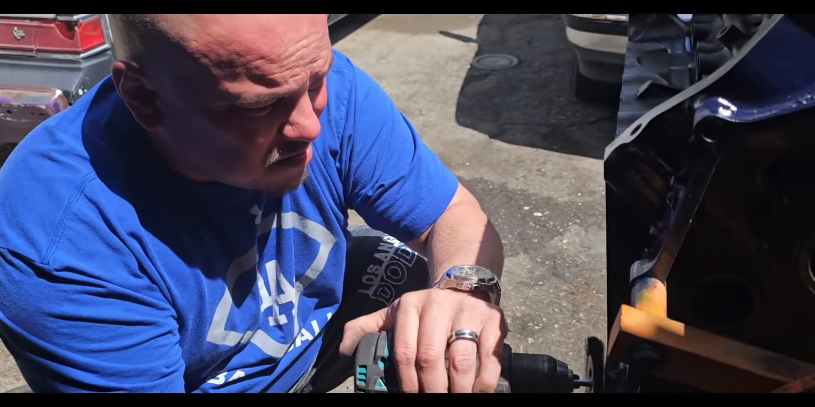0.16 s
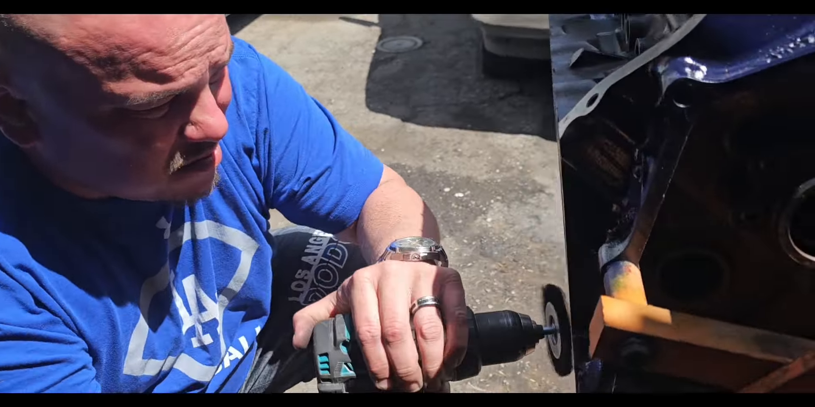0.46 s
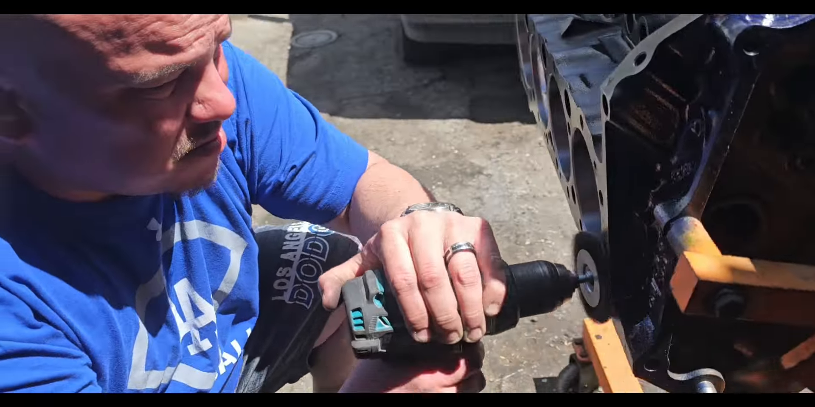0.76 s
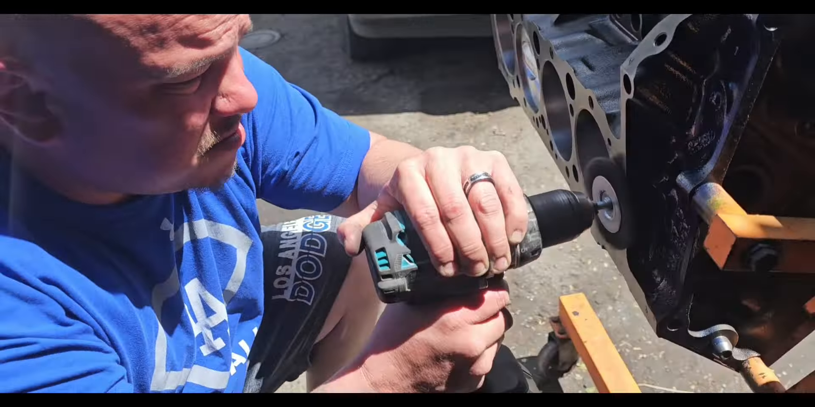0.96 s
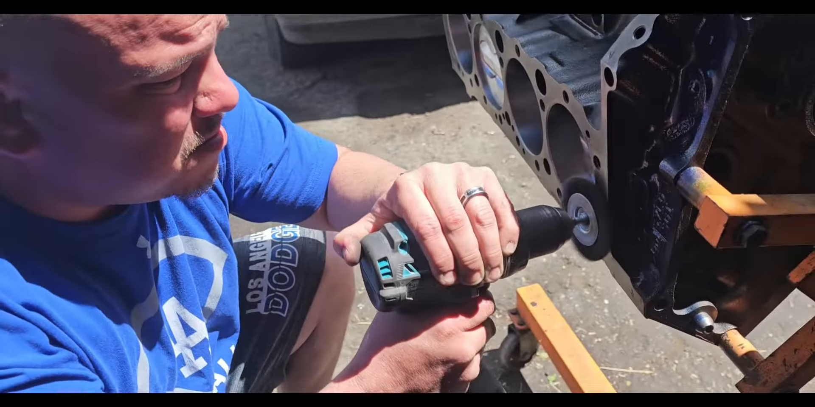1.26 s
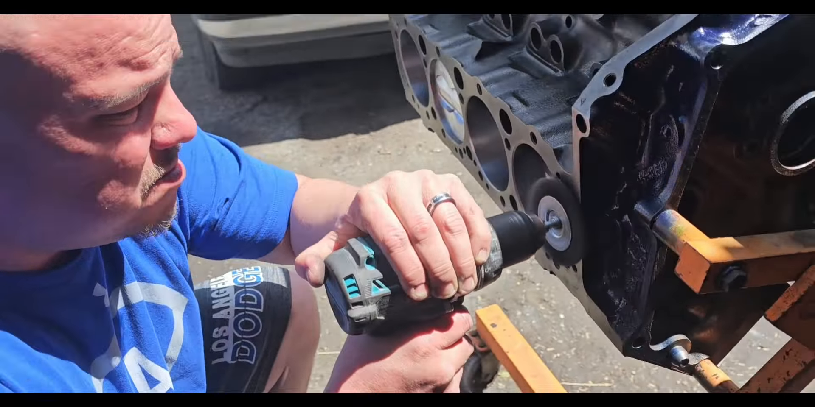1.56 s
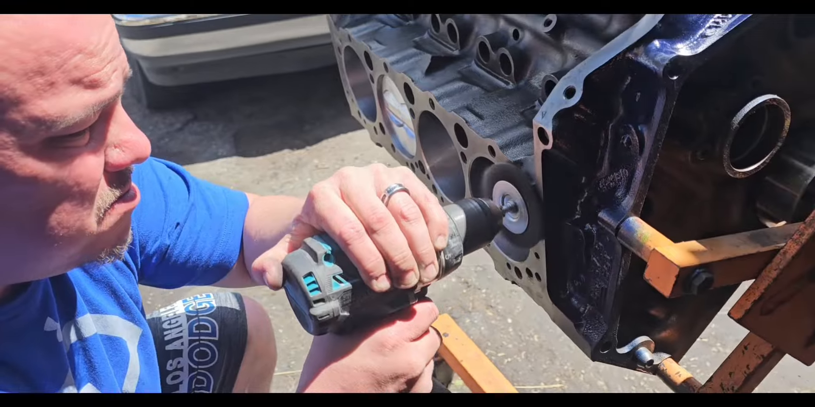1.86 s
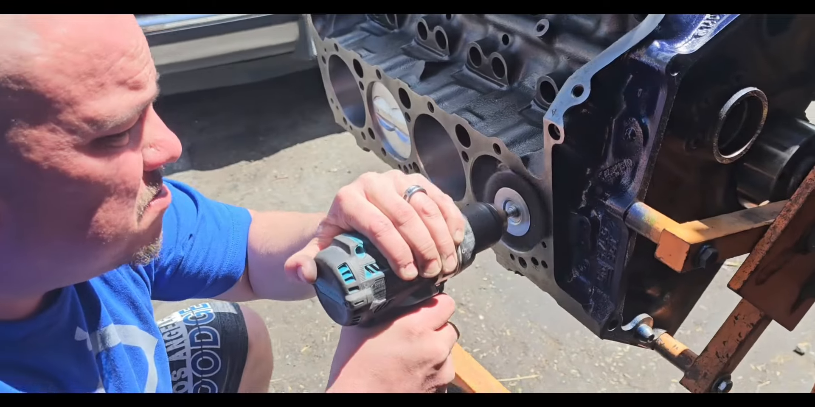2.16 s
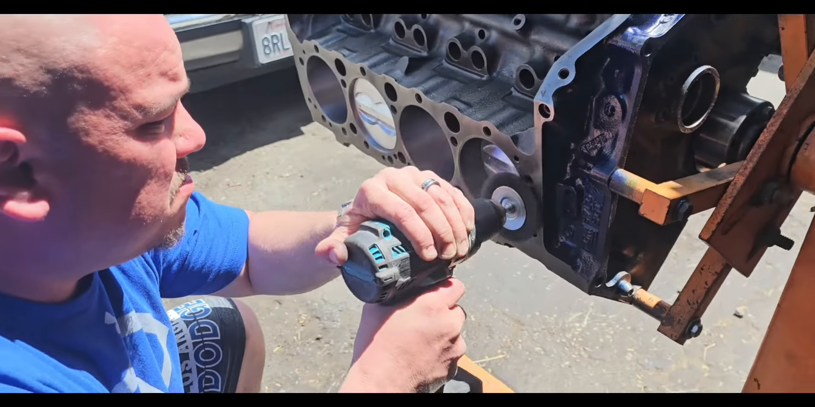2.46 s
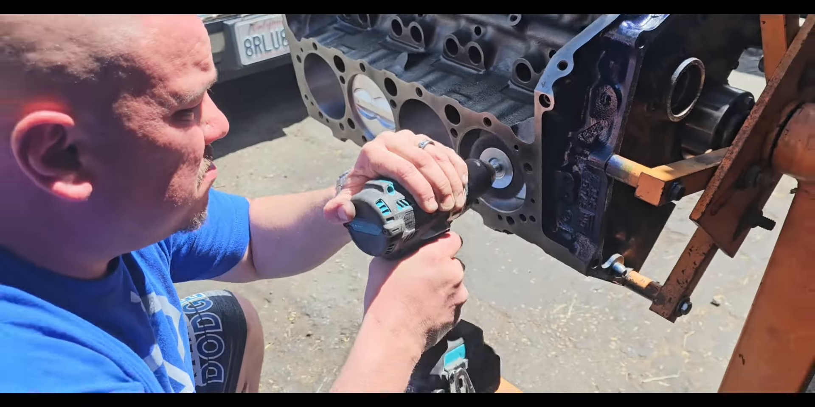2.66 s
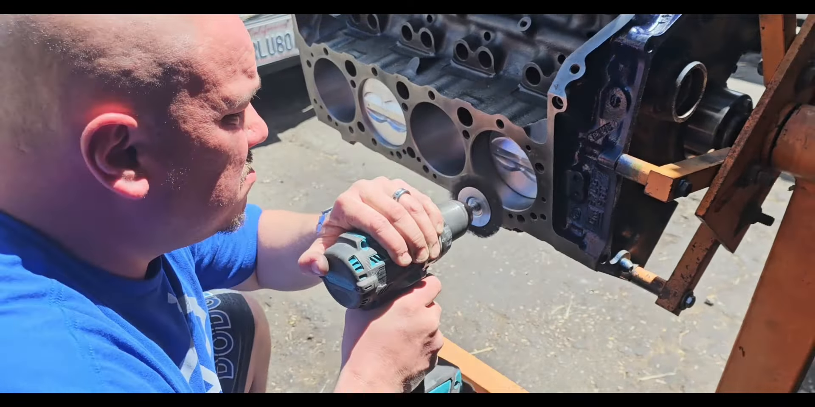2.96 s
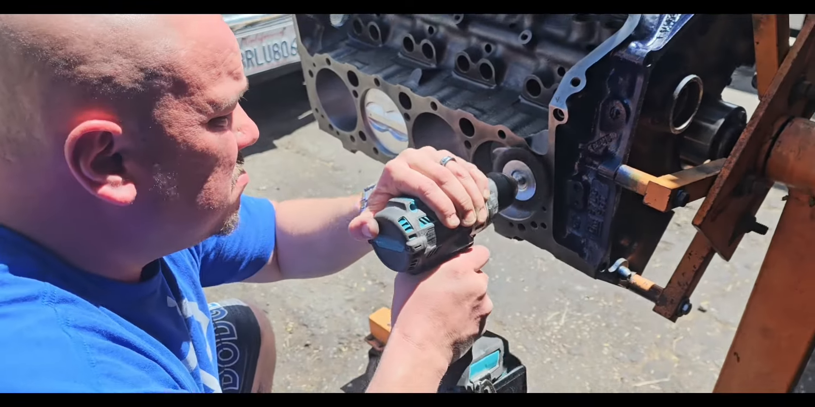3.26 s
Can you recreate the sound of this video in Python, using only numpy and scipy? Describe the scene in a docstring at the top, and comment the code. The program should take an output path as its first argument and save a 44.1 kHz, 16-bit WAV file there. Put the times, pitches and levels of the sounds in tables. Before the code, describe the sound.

Wire wheel on a drill hisses and rasps against an iron engine block, clacking through one quick stop

```python
"""Wire wheel on an engine block

A cordless drill spins a wire wheel on cast iron, an arm's length from a stereo microphone.
The scrape is random bristle flicks and hiss over coloured noise; motor and gears add tones locked to
the turning shaft. Near the end the trigger is let go: the drill brakes nearly to a stop with gear clacks,
noise bursts ringing the gearbox, and spins up again. Filtered noise and sines put rumble and hum behind."""
import sys
import numpy as np
from scipy import signal
from scipy.fft import rfft, irfft
from scipy.io import wavfile
from scipy.ndimage import uniform_filter1d

SR = 44100
rng = np.random.default_rng(int(sys.argv[2]) if len(sys.argv) > 2 else 0)


def inscribe(sig):
    """Save sig as 16-bit PCM at rate SR to the path in sys.argv[1].

    A 1-D sig is mono; a 2-D sig holds one channel per row.
    Samples are clipped to [-1, 1] before scaling.
    """
    pcm = np.round(np.clip(np.atleast_2d(sig).T, -1, 1) * 32767)
    wavfile.write(sys.argv[1], SR, pcm.astype(np.int16))


N = 149940
T = np.arange(N) / SR  # seconds
F = np.maximum(np.fft.rfftfreq(N, 1 / SR), 1)  # Hz

# Motor speed, before a slight flutter: time_s, turns_per_s
MOTOR_SPEED = [(0, 457.5), (.25, 455.6), (1.3, 454.6), (1.9, 452.8), (2.16, 454.6), (2.35, 449.5),
               (2.52, 454.5), (2.76, 447.5), (2.87, 455.5), (2.97, 457.5), (3.0, 438), (3.035, 388),
               (3.06, 335), (3.085, 290), (3.125, 235), (3.2, 30), (3.275, 30), (3.295, 280), (3.335, 385),
               (3.36, 418), (3.4, 448)]

# Scrape of the wheel, before SCRAPE_DB and TREBLE_DB: time_s, level_db, treble_rel_db
SCRAPE = [(0.0, -27, -3), (0.79, -23.5, -5), (1.27, -23, -4), (1.6, -23.5, -3.5), (1.69, -24.5, -2.5),
          (1.73, -23.5, -4.5), (2.17, -23, -4), (2.34, -21.5, -6), (2.41, -23.5, -4), (2.72, -22, -5.5),
          (2.96, -26.5, -3.5), (3.01, -23, -5), (3.05, -27, 6.5), (3.08, -24.5, -3.5), (3.13, -26.5, -5.5),
          (3.14, -20.5, -4), (3.16, -34, 0), (3.2, -26, -19), (3.23, -37.5, -14), (3.25, -42, -9),
          (3.27, -34.5, -13), (3.28, -24, -7), (3.29, -25.5, -6.5), (3.4, -27, -2)]
# Spectrum of bristles on iron: freq_hz, relative_db
BRISTLE_COLOUR = [(150, -31), (400, -41), (1400, -7.5), (1800, -14.5), (2300, -2.5), (3000, 0.5),
                  (3700, -4), (4300, 4.5), (4900, 2), (5500, 1), (6500, -6.5), (7800, -5), (9000, -9),
                  (9800, -5.5), (10080, -19), (10800, -10.5), (11600, -5.5), (13000, -11), (14500, -6.5),
                  (16000, -24)]
# Stereo balance of the scrape: freq_hz, left_minus_right_db
SCRAPE_PAN = [(500, -8), (1500, 0), (2600, 0.5), (4000, -5), (5800, -4), (7000, -3.5), (8100, 5), (9200, 5),
              (11000, -5.8), (13000, 10), (15000, -4.5)]
# The block's ringing band, which shifts with the place of contact: time_s, level_db, centre_hz
BLOCK_RINGING = [(0, -30, 3950), (.2, -28.5, 3970), (.44, -24.5, 4120), (.51, -27.5, 4050),
                 (.58, -22.5, 4000), (.63, -27, 4060), (.68, -22.5, 4000), (.77, -23, 3920),
                 (.81, -25, 3920), (.92, -23.5, 3900), (1.0, -26.5, 3950), (1.25, -28, 3990),
                 (1.4, -25.5, 3870), (1.6, -26, 3820), (1.85, -26, 3770), (2.05, -27.5, 3920),
                 (2.2, -28.5, 3880), (2.34, -26.5, 4030), (2.44, -32, 3830), (2.65, -29, 3900),
                 (2.9, -32, 3700), (3.09, -29, 3860), (3.16, -29.5, 3850), (3.2, -22.5, 4050),
                 (3.23, -63, 4000), (3.272, -65, 3400), (3.29, -34, 3440), (3.32, -36, 3500),
                 (3.4, -49, 3900)]
# Low-mid air rush of the motor's cooling fan, before a 4 dB lift: time_s, level_db
FAN_RUSH = [(0.0, -43), (1.78, -41), (1.83, -39), (2.19, -43), (2.27, -39), (2.34, -43), (2.73, -41),
            (2.77, -45), (3.17, -39), (3.26, -58), (3.28, -39), (3.29, -37), (3.3, -48), (3.4, -41)]
# Its spectrum: freq_hz, relative_db
FAN_RUSH_COLOUR = [(200, -20), (410, -12), (520, -3.5), (700, -3.5), (850, -4), (1050, 1.5), (1400, -1),
                   (1700, 2), (2100, 1), (3000, -20), (9000, -45)]
SCRAPE_DB, TREBLE_DB = 1.68, 9.5
FLICKS_PER_S, FLICK_SPREAD_DB, HISS_SHARE = 5000, -1, 0.37
WHIRR_DB, COASTING_WHIRR_DB = -12.5, 12  # gear tones within the scrape, and their rise below full speed
CATCHES_PER_S, CATCH_SIZE, CATCH_DECAY_S = 130, .45, .001  # wires that snag and spring free
WANDER_DB, WANDER_HZ, WANDER_BAND_HZ = 1.4, 4, (1800, 10000)
RING_WIDTH_HZ, RING_SURGE_DB, RING_SURGE_HZ = 900, 1.8, 25

# Main whine of the motor, before its rougher part is added: time_s, level_db
WHINE = [(0, -36), (.04, -57), (.17, -50), (.29, -34), (.68, -32), (.93, -36.5), (1.12, -43), (1.44, -37.5),
         (1.54, -41), (1.68, -36), (1.85, -35.5), (2.2, -38.5), (2.36, -45), (2.44, -37), (2.56, -36),
         (2.68, -49), (2.87, -38.5), (3.0, -43), (3.06, -58), (3.22, -70), (3.3, -68), (3.4, -38)]
# Gear mesh tone: time_s, level_db
GEAR_MESH = [(0, -46), (.35, -44), (.45, -35), (.55, -41), (.65, -31), (.83, -44), (1.05, -35), (1.4, -38),
             (1.55, -32), (1.68, -40), (1.85, -31), (2.15, -31), (2.37, -27.5), (2.46, -38), (2.75, -36),
             (2.95, -50), (3.2, -65), (3.4, -48)]
# Second gear tone, joining under heavy load: time_s, level_db
UPPER_MESH = [(0, -49), (2.17, -45), (2.25, -33), (2.38, -33.5), (2.44, -46), (2.7, -40), (2.95, -50),
              (3.2, -70)]
# Tone at the motor's turning rate: time_s, level_db
SHAFT = [(0, -52), (1.0, -54.5), (2.2, -58), (2.5, -58.5), (3.0, -60.5), (3.2, -83), (3.4, -56)]
# Other motor and gear tones: multiple_of_motor_speed
OTHER_ORDERS = [8, 16, 22.85, 23]
# For each of these, at top speed: level_db, roughness_0_to_1, left_minus_right_db
OTHER_TONES = [(-43, 1, 3), (-40.5, 0.5, 4), (-46, 1, -4), (-36, .65, 10)]
WHINE_ORDER, MESH_ORDER, UPPER_MESH_ORDER = 4, 10.17, 11.52  # multiples of the motor speed

# Gear tones while the speed changes, before the brake's swell and the housing's treble filter:
# multiple_of_motor_speed, braking_db, speeding_up_db, roughness_0_to_1
GEAR_STRAIN = [(8, -31, -34, .55), (10.17, -43, -35, .85), (14.3, -42, -44, .9), (19, -50, -44, .9),
               (23, -50, -44, .95)]
FULL_STRAIN = 700  # change of speed (turns per second, per second) that loads the teeth fully
HOUSING_HZ, STRAIN_PATCH_DB = 2900, 2
BRAKE_S, BRAKE_DECAY_S, BRAKE_SWELL_DB = 2.996, .036, 14

# Clacks of gears and chuck, as drive into the gearbox: start_s, level_db
CLACKS = [(2.3712, -15), (3.0155, -18), (3.0265, -18), (3.0415, -12), (3.060, -18), (3.108, -18),
          (3.1325, -21), (3.138, -20), (3.1436, -13.5), (3.17, -19), (3.1917, -8.5), (3.199, -22),
          (3.2775, -9.5)]
# Ring of gearbox and chuck: pitch_hz, relative_db, t60_s
GEARBOX_RING = [(2420, 0, .04), (2650, -3, .03), (3540, -6, .025), (4030, 0, .03), (4580, -7, .025),
                (6330, -9, .02), (8650, -12, .02)]
RATTLE_PER_S, RATTLE_DB = 200, -21.5

# Soft knocks, before reflections: start_s, pitch_hz, level_db, decay_s
KNOCKS = [(2.452, 251, -39.5, 0.042), (2.459, 172, -36.5, 0.023), (2.481, 80, -41, 0.018),
          (3.233, 96, -24, 0.0057)]
# Faint low rumble: time_s, level_db
RUMBLE = [(0, -59.5), (.9, -63), (1.15, -49.5), (1.45, -54.5), (1.8, -60), (2.3, -57.5), (3.4, -71)]

# Spectrum of the outdoor background: freq_hz, relative_db
YARD_COLOUR = [(20, -2), (40, -16), (60, 2), (90, -2), (160, -10), (260, -3.5), (400, -6), (1000, -18.5),
               (4000, -10), (15000, -42)]
# Steady hum: pitch_hz, level_db
HUM = [(58.5, -60), (119, -59), (258, -70)]
YARD_DB = -53

# Phase between the microphone ports: freq_hz, left_lead_rad
PORT_PHASE = [(0, -0.5), (1030, 1.72), (1810, 4.5), (2500, 5.5), (2760, 6.5), (3620, 14), (3960, 13),
              (4480, 17), (7320, 18), (8100, 18.5), (9130, 23.5), (10200, 23.5), (12400, 27.5), (16100, 30)]
LIKENESS, LIKENESS_HZ = .88, 2000  # likeness of the sides in the bass, and where it has halved
TOP_HZ = 15520


def wheel(angle, speed):
    """Wire tips flick the iron thousands of times a second and ring it; the finest flicks merge into hiss."""
    rub = ports(bristle_rub(angle, speed)) * snags()
    rub = rub * undb(0.1 * walk(48) + 0.13 * walk(210))

    # The block's resonance, with the sides swapped
    ring = resonate(rub, curve(BLOCK_RINGING, axis=2), RING_WIDTH_HZ)[::-1]
    ring = ring * undb(RING_SURGE_DB * walk(RING_SURGE_HZ))

    coloured = colour(wander(rub), BRISTLE_COLOUR)
    panned = unit(irfft(rfft(coloured) * pan(spectrum(SCRAPE_PAN)), N))

    # Split at 7 kHz so the treble moves on its own
    bins = rfft(panned)
    high = 1 / (1 + (7000 / F) ** 6)
    lower = irfft(bins * (1 - high), N)
    treble = irfft(bins * high, N) * undb(curve(SCRAPE, axis=2) + TREBLE_DB)
    scrape = (lower + treble) * undb(curve(SCRAPE) + SCRAPE_DB)
    return scrape + ring * pan(-2.5) * undb(curve(BLOCK_RINGING))


def bristle_rub(angle, speed):
    """Random signed flicks with short scattered reflections, mixed with hiss and gear whirr."""
    chance, size, sign = rng.random(N), rng.exponential(size=N), rng.choice([-1, 1], N)
    strikes = chance < FLICKS_PER_S / SR
    flicks = unit(strikes * sign * undb(FLICK_SPREAD_DB * np.minimum(size, 6)))
    flicks = unit(reflect(flicks, t60=0.0036, wet_db=14))
    hiss = rng.standard_normal((2, N))

    relative_speed = speed / speed.max()
    coasting = np.clip(10 * (1 - relative_speed), 0, 1)
    gears = undb(WHIRR_DB + COASTING_WHIRR_DB * coasting) * relative_speed
    mix = np.sqrt(1 - HISS_SHARE) * flicks + np.sqrt(HISS_SHARE) * hiss + gears * whirr(angle)
    return mix / np.sqrt(1 + 2 * gears ** 2)


def snags():
    """Gain that jumps as wires snag and decays as they spring free."""
    catches = (rng.random(N) < CATCHES_PER_S / SR) * np.minimum(rng.exponential(size=N), 3)
    return 1 + CATCH_SIZE * signal.lfilter([1], [1, -np.exp(-1 / (CATCH_DECAY_S * SR))], catches)


def whirr(angle, count=56):
    """A crowd of weak, fluttering gear and bristle tones that follow the speed."""
    orders = np.linspace(2, 20, count) + rng.uniform(-.15, .15, count)
    ripple = np.array([walk(13.4) for side in range(2)])
    out = 0
    for order in orders:
        flutter = np.roll(ripple, rng.integers(N), axis=1)
        out = out + flutter * np.cos(order * angle + rng.uniform(0, 2 * np.pi, (2, 1)))
    return unit(out)


def wander(x, count=22):
    """As the wheel shifts on the iron, narrow bands of the scrape swell and fade on their own."""
    place = np.interp(F, WANDER_BAND_HZ, [0, count - 1])
    whole, drift = rfft(x), walk(WANDER_HZ)
    out = 0
    for k in range(count):
        band = irfft(whole * np.maximum(1 - np.abs(place - k), 0), N)
        out = out + band * undb(WANDER_DB * np.roll(drift, rng.integers(N)))
    return out


def fan_rush():
    """Low-mid air rush of the motor's cooling fan, as coloured noise."""
    body = unit(ports(colour(rng.standard_normal((2, N)), FAN_RUSH_COLOUR)))
    return body * pan(1.6) * undb(curve(FAN_RUSH) + 4 + .8 * walk(60))


def motor(angle, speed):
    """Shaft, pole and gear tones at fixed multiples of the motor speed."""
    effort = (speed / speed.max()) ** 22  # these tones fade steeply below top speed
    out = 0
    for order, (db, rough, lr_db) in zip(OTHER_ORDERS, OTHER_TONES):
        part = tone(order * angle, rough, width_hz=max(order, 50 * rough ** 2))
        out = out + undb(db) * pan(lr_db) * part * effort
    out += undb(curve(SHAFT)) * pan(8.7) * tone(angle, rough=0.09, width_hz=1.8)

    whine = tone(WHINE_ORDER * angle, rough=.35, width_hz=16)
    whine += undb(-6) * tone(WHINE_ORDER * angle, rough=1, width_hz=70)
    out += undb(curve(WHINE)) * pan(4.2) * whine

    out += undb(curve(GEAR_MESH)) * pan(-5) * tone(MESH_ORDER * angle, rough=.65, width_hz=24)
    upper = tone(UPPER_MESH_ORDER * angle, rough=.7, width_hz=45)
    return out + undb(curve(UPPER_MESH)) * pan(-3) * upper


def strain(angle, speed):
    """Gear teeth sing in patches as the motor brakes or speeds up; the small housing radiates their treble."""
    change = uniform_filter1d(np.gradient(speed, T), size=400)
    swell = (T > BRAKE_S) * np.exp(-np.abs(T - BRAKE_S) / BRAKE_DECAY_S)
    braking = np.clip(-change / FULL_STRAIN, 0, 1) * undb(BRAKE_SWELL_DB * swell)
    rising = np.clip(change / FULL_STRAIN, 0, 1)
    out = 0
    for order, down_db, up_db, rough in GEAR_STRAIN:
        radiated = 1 / (1 + (HOUSING_HZ / (order * speed)) ** 12)
        patches = undb(STRAIN_PATCH_DB * walk(40))
        load = undb(down_db) * braking + undb(up_db) * rising
        out = out + load * radiated * patches * tone(order * angle, rough, width_hz=120)
    return out


def clacks(speed):
    """Gears and chuck close with cracks that ring the gearbox; slack rattles while the motor slows fast."""
    decay_s = 0.0014
    push = sum(undb(db) * (T >= s) * np.exp(-np.abs(T - s) / decay_s) for s, db in CLACKS)
    slowing = np.gradient(speed, T) < -1000  # turns per second, per second
    taps = (rng.random(N) < RATTLE_PER_S / SR) * rng.random(N) * slowing * undb(RATTLE_DB)
    push = push + signal.lfilter([1], [1, -np.exp(-1 / (decay_s * SR))], taps)
    crack = push * np.tanh(rng.standard_normal((2, N))) * 1.16

    ring = 0
    for hz, db, t60 in GEARBOX_RING:
        ring = ring + undb(db) * np.sin(2 * np.pi * hz * T) * np.exp(-np.log(1000) * T / t60)
    rung = signal.fftconvolve(crack, ring[None] / np.sqrt(np.sum(ring ** 2)))[:, :N]

    snap_colour = [(100, -46), (600, 6), (1500, -7.5), (2500, 19), (4500, 10.0), (8000, 10), (15000, -8)]
    snap = colour(ports(crack), snap_colour)
    return reflect(undb(-2) * rung + undb(-4) * snap, t60=.1, wet_db=-12)


def knocks():
    """Dull bumps as the tool and its work shift: decaying low sines with reflections."""
    out = 0
    for s, hz, db, decay in KNOCKS:
        age = np.maximum(T - s, 0)
        out = out + undb(db) * np.sin(2 * np.pi * hz * age) * np.exp(-age / decay)
    return reflect(out, t60=.1, wet_db=-19)


def rumble():
    """A faint low rumble of coloured noise that swells for a moment."""
    shape = [(60, -47), (150, -3.0), (200, 2), (300, 1.0), (500, -23), (2000, -65)]
    noise = unit(ports(colour(rng.standard_normal((2, N)), shape)))
    return noise * undb(curve(RUMBLE))


def yard():
    """Low outdoor rumble of mostly central noise, and a faint hum of sines with drifting phase."""
    mid, side = unit(colour(rng.standard_normal((2, N)), YARD_COLOUR))
    air = undb(YARD_DB) * (mid + undb(-7) * side * np.array([[1], [-1]]))
    hum = 0
    for hz, db in HUM:
        hum = hum + undb(db) * np.sqrt(2) * np.sin(2 * np.pi * hz * T + 1.46 * walk(9.9))
    return air + hum


def tone(angle, rough, width_hz):
    """A rotating part's tone; it flutters in level and phase, differently on each side."""
    rough = np.clip(rough, 0, 1)
    flutter = np.array([walk(width_hz) + 1j * walk(width_hz) for side in range(2)])
    steady = np.sqrt(2 * (1 - rough ** 2))
    return np.real((steady + rough * flutter) * np.exp(1j * angle))


def resonate(x, hz, width_hz):
    """A resonance whose centre moves: shift it to zero, low-pass, shift back."""
    spin = np.exp(2j * np.pi * np.cumsum(hz) / SR)
    pole = np.exp(-np.pi * width_hz / SR)
    return unit(np.real(spin * signal.lfilter([1], np.poly([pole, pole]), x / spin)))


def reflect(x, t60, wet_db):
    """Add scattered reflections, different for each side."""
    tail = rng.standard_normal((2, N)) * np.exp(-np.log(1000) * T / t60)
    tail /= np.sqrt(np.sum(tail ** 2, axis=1, keepdims=True))
    return x + undb(wet_db) * signal.fftconvolve(np.atleast_2d(x), tail, axes=1)[:, :N]


def ports(x):
    """Two unrelated sounds become a stereo field: alike in the bass, with a phase shift on the left."""
    likeness = LIKENESS / (1 + (F / LIKENESS_HZ) ** 2)
    turn = np.arcsin(likeness) / 2
    both = rfft(x)
    both = np.cos(turn) * both + np.sin(turn) * both[::-1]
    lead = np.interp(F, *np.array(PORT_PHASE).T) * np.array([[1], [0]])
    return irfft(both * np.exp(1j * lead), N)


def pan(db):
    """Left and right gains for a left-minus-right difference in dB."""
    return undb(np.array([[1], [-1]]) * db / 2)


def colour(x, rows):
    """Causal (minimum-phase) filter with the given (Hz, dB) shape."""
    cep = irfft(np.log(undb(spectrum(rows))), N)
    cep[1:N // 2] *= 2
    cep[N // 2 + 1:] = 0
    return irfft(rfft(x) * np.exp(rfft(cep)), N)


def spectrum(rows):
    """(Hz, dB) points joined on a log frequency axis."""
    hz, db = np.array(rows, float).T
    return np.interp(np.log(F), np.log(hz), db)


def curve(rows, axis=1):
    """One column of a table, joined by straight lines in time."""
    rows = np.array(rows, float)
    return np.interp(T, rows[:, 0], rows[:, axis])


def walk(hz):
    """Smooth chance up to about hz, spread 1."""
    return unit(irfft(rfft(rng.standard_normal(N)) / (1 + (F / hz) ** 4), N))


def unit(x):
    """Scale to rms 1."""
    return x / np.sqrt(np.mean(x ** 2))


def undb(db):
    """Decibels to gain."""
    return 10 ** (np.asarray(db) / 20)


def scene():
    """The drill at work, an arm's length away, over the background."""
    speed = curve(MOTOR_SPEED)
    angle = 2 * np.pi * np.cumsum(speed * (1 + 0.00057 * walk(21.4))) / SR
    drill = wheel(angle, speed) + fan_rush() + motor(angle, speed) + strain(angle, speed)
    bumps = clacks(speed) + knocks()
    return drill + bumps + rumble() + yard()


def record(dry):
    """The recorder cuts the top with a steep low-pass."""
    return signal.sosfilt(signal.ellip(14, .2, 80, TOP_HZ, fs=SR, output="sos"), dry)


dry = scene()
out = record(dry)
inscribe(out)
```